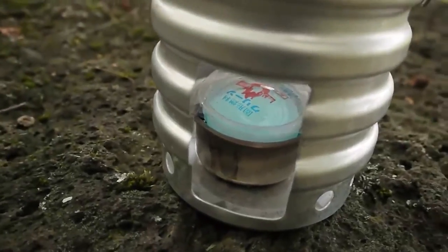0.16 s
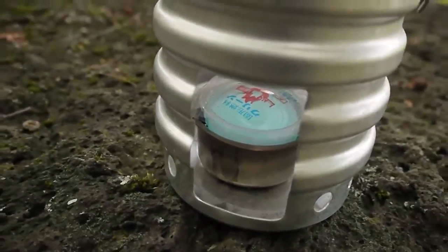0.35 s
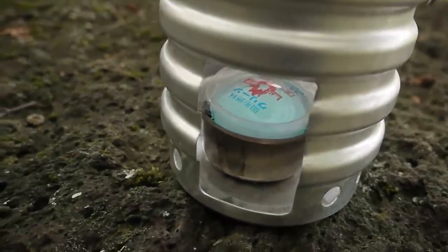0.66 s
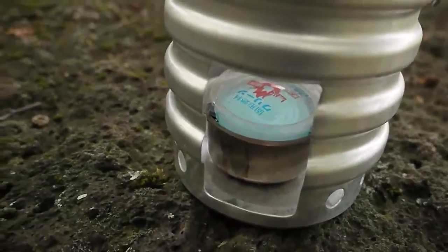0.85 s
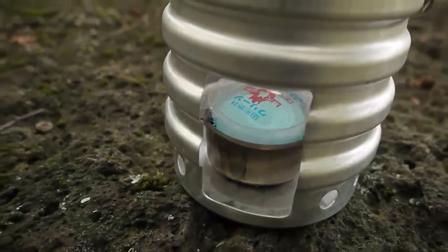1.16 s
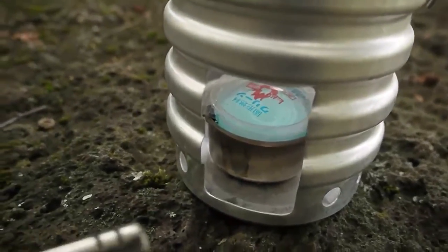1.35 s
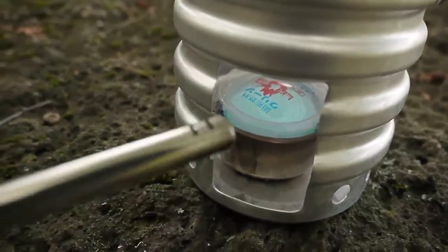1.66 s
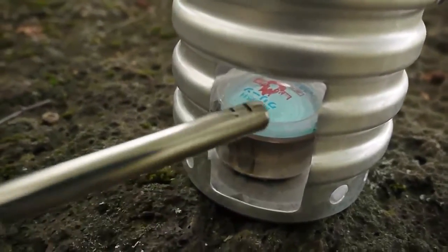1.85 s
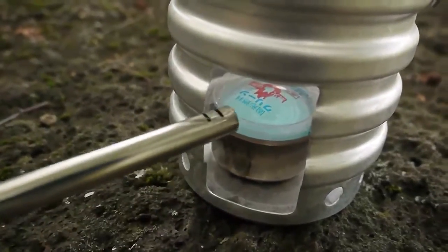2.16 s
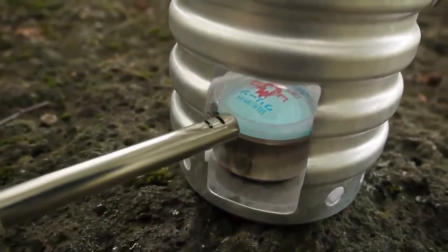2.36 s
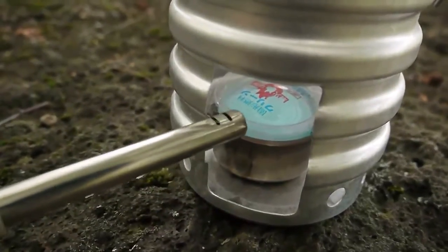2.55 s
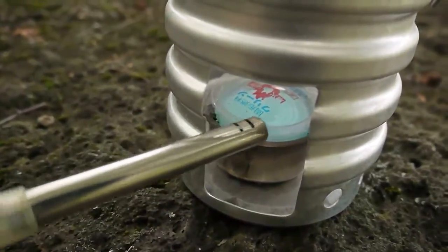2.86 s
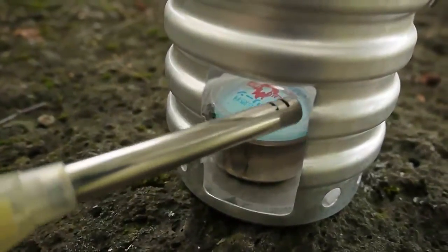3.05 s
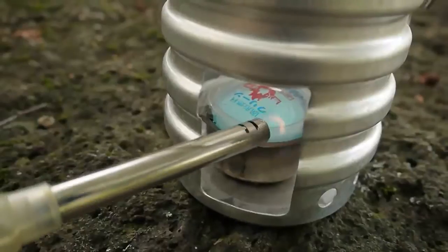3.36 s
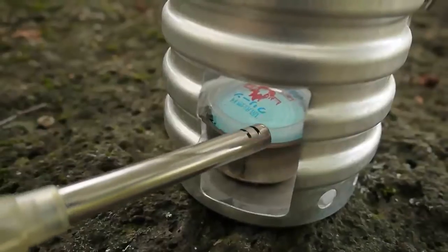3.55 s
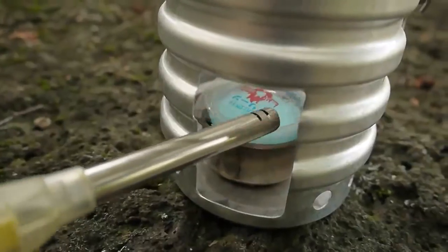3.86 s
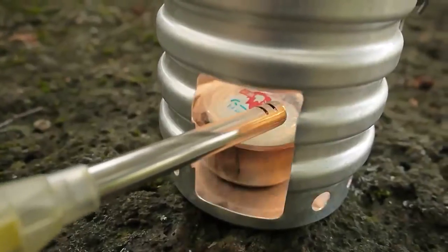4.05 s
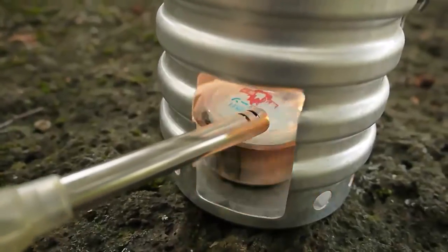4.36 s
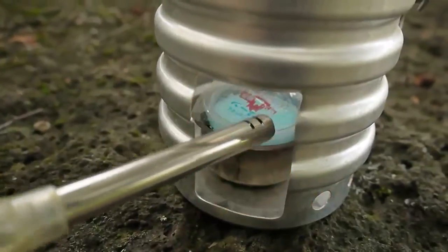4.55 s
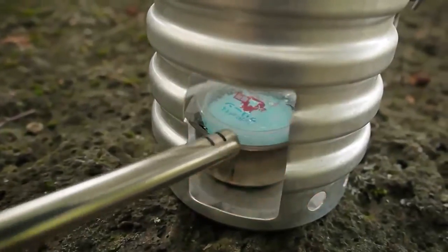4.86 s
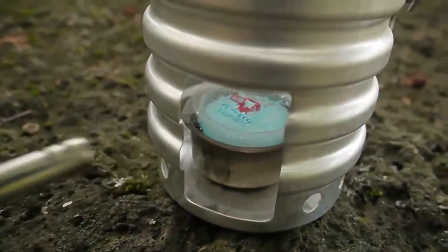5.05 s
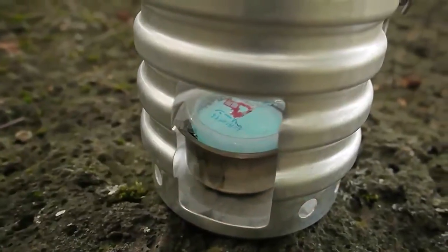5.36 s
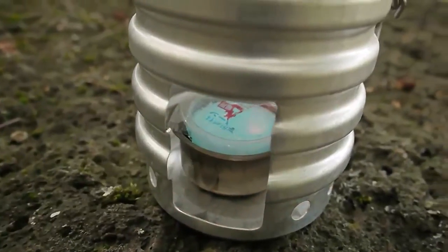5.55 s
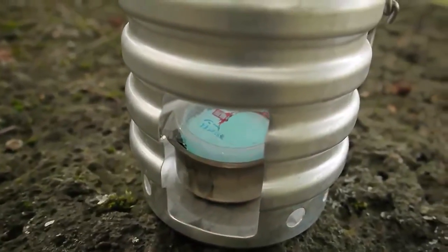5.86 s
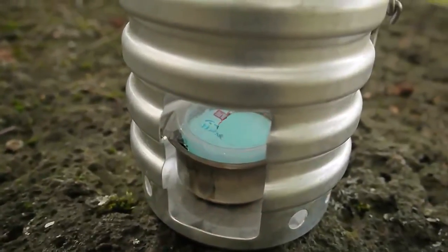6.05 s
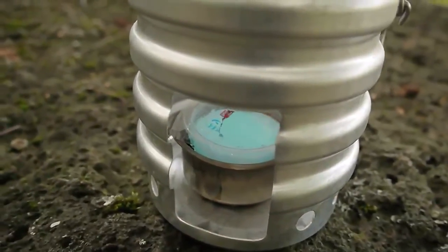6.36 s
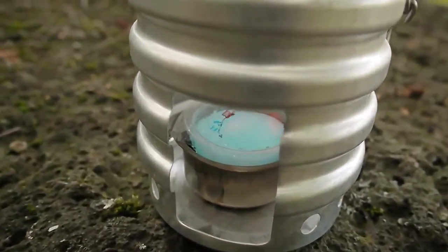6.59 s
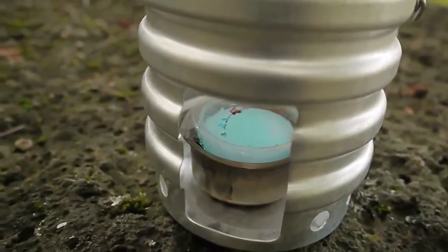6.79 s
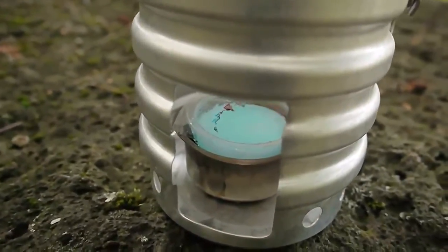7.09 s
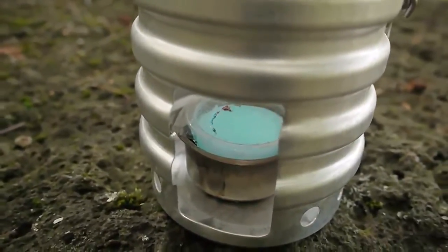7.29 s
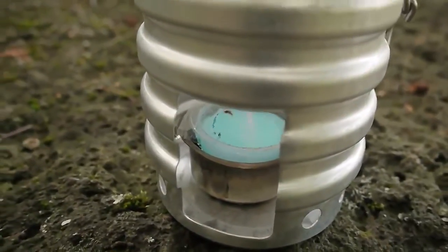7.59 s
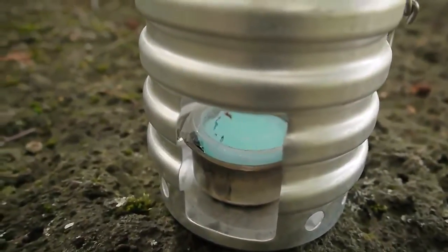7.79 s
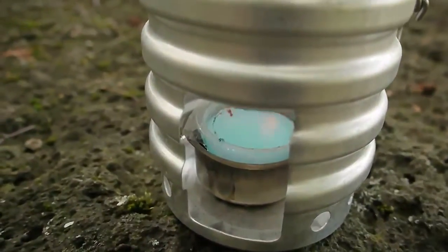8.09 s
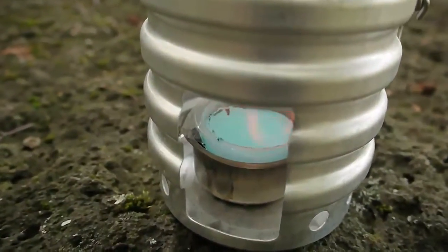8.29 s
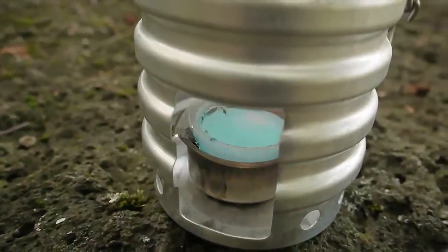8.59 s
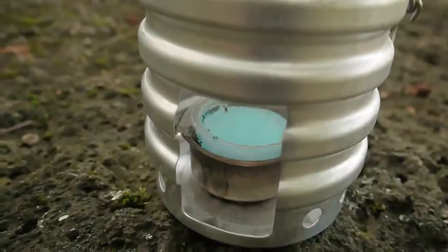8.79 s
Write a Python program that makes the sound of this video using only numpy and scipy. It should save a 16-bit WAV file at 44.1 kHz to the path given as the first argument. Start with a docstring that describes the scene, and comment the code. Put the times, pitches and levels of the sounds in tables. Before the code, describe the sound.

Close up outdoors, lighter handling clicks, two sharp trigger snaps, puffing ignitions, then sparse crackling of melting film amid low fluttering flame and breeze.

```python
"""A wand lighter lights a film-wrapped fuel tablet in a small aluminium camping stove, outdoors and close by.
The lighter is handled (coloured noise bursts, grainy rubbing), knocks the windshield (damped modes) and snaps twice.
The gas catches in two main puffs (damped sines, flaring noise); then the film crackles (random grains) and vents.
Throughout, breeze and flame rumble (gusty low noise, pressure swings) over air and a wavering far hiss (noise)."""
import sys
import numpy as np
from scipy import signal
from scipy.fft import rfft, irfft
from scipy.io import wavfile
from scipy.ndimage import uniform_filter1d

SR = 44100
rng = np.random.default_rng(int(sys.argv[2]) if len(sys.argv) > 2 else 0)


def persist_wave(psi):
    """Save psi, clipped to +-1, as 16-bit WAV."""
    counts = np.round(np.clip(psi, -1, 1) * 32767).astype(np.int16)
    wavfile.write(sys.argv[1], SR, np.atleast_2d(counts).T)


N = 393813
TIME = np.arange(N) / SR
SHORT = TIME[:4096]
BAND_HZ = 7950  # upper edge of the microphone band


def undb(db):
    """Decibels to gain."""
    return 10 ** (np.asarray(db) / 20)


def unit(x):
    """Scale to an rms of one."""
    return x / np.std(x)


def peak(x, db):
    """Scale to a peak level."""
    return x * undb(db) / np.abs(x).max()


def burst(x, db):
    """Scale to an rms level over the first 10 ms."""
    return x * undb(db) / np.std(x[:SR // 100])


def noise():
    """White noise over the whole scene."""
    return rng.standard_normal(N)


def curve(rows):
    """Join (time_s, value) rows by straight lines."""
    return np.interp(TIME, *np.transpose(rows))


def add(track, start_s, sound):
    """Mix a sound into a track from start_s on."""
    start = max(int(start_s * SR), 0)
    track[start:start + len(sound)] += sound[:N - start]


def colour(x, points):
    """Causal minimum-phase filter with the given (freq_hz, gain_db) outline."""
    size = 2048
    hz, db = np.transpose(sorted(map(tuple, points)))
    bins_hz = np.fft.rfftfreq(size, 1 / SR)
    outline_db = np.interp(np.log(bins_hz + 1), np.log(hz), db)
    # folding the cepstrum onto positive times gives minimum phase
    cepstrum = irfft(np.log(undb(outline_db)))
    cepstrum[1:size // 2] *= 2
    cepstrum[size // 2 + 1:] = 0
    response = irfft(np.exp(rfft(cepstrum)))
    return signal.fftconvolve(x, response)[:len(x)]


def fade(t, t60_s):
    """Exponential decay from t = 0, down 60 dB after t60_s."""
    return np.exp(-np.log(1000) * np.maximum(t, 0) / max(t60_s, 1e-4))


def ring(modes):
    """Damped sines of a struck object, from (pitch_hz, gain_db, t60_s) rows."""
    t = TIME[:SR]
    return sum(undb(db) * np.sin(2 * np.pi * hz * t) * fade(t, t60_s) for hz, db, t60_s in modes)


def crack(scatter, rise_s, hold_s, t60_s, tail_db, tail_t60_s):
    """A contact that builds up, rattles briefly and dies away, with a faint tail from the surroundings."""
    rattle = rng.standard_normal(len(SHORT)) * (1 - fade(SHORT, rise_s))
    envelope = fade(SHORT - hold_s, t60_s) + undb(tail_db) * fade(SHORT, tail_t60_s)
    push = scatter * rattle * envelope
    push[int(SR * rise_s / 3)] += 1  # one sharp click
    return push


def walk(rate_hz):
    """Smooth random wander with a spread of one."""
    hold = int(SR / rate_hz)
    steps = np.repeat(rng.standard_normal(N // hold + 1), hold)[:N]
    return unit(uniform_filter1d(uniform_filter1d(steps, hold), hold))


def grains(per_s, spread_db):
    """Random tiny clicks, many small and a few large."""
    sizes = undb(spread_db * np.minimum(rng.exponential(size=N), 4))
    hits = rng.random(N) < per_s / SR
    return unit(hits * sizes * rng.choice([-1, 1], N))


def flicker(x, depth_db, rate_hz):
    """Vary the colour of grains: neighbouring bands swell and sink on their own."""
    out = np.zeros(N)
    for hz in np.geomspace(1100, 7000, num=8):
        band = signal.sosfiltfilt(signal.butter(3, hz, fs=SR, output="sos"), x)
        out += band * undb(depth_db * walk(rate_hz))
        x = x - band
    return out + x


def swells(rows, attack_s, release_s):
    """Gain of overlapping (start_s, length_s, level_db) events that each rise, hold and die away."""
    power = np.zeros(N)
    for start_s, length_s, db in rows:
        t = np.arange(int((length_s + release_s) * SR)) / SR
        gain = undb(db) * (1 - fade(t, attack_s)) * fade(t - length_s, release_s)
        add(power, start_s, gain ** 2)
    return np.sqrt(power)


def rubbing():
    """Hand and wand rub: a run of tiny slips whose force comes and goes."""
    # strokes: start_s, length_s, level_db
    strokes = [(0.1, 0.08, -37), (0.19, 0.075, -32.5), (0.41, 0.16, -45), (0.6, 0.078, -43), (0.8, .1, -44),
               (0.88, .085, -41), (2.23, 0.086, -36.5), (2.345, 0.019, -38.5), (5.97, 0.22, -45.5),
               (6.23, 0.22, -42.5)]
    # spectrum of the rubbing: freq_hz, gain_db
    rub_colour = [(240, -35.5), (400, -18.5), (675, -19.5), (823, -10.5), (1530, -9), (1870, -8.5),
                  (2290, -9), (2760, -11.5), (5670, -19), (7840, -28), (10200, -64.5), (17200, -120)]
    slips = grains(per_s=1700, spread_db=4.6) * undb(2.2 * walk(rate_hz=110))
    slips = flicker(slips, depth_db=3.5, rate_hz=140)
    return unit(colour(slips, rub_colour)) * swells(strokes, attack_s=0.061, release_s=0.15)


def contact(pitch_hz, tilt_db, t60_s):
    """One tick of plastic or metal: a short rattle with a broad resonance at its own pitch."""
    # colour that all contacts share: freq_hz, gain_db
    tick_colour = [(150, -22.5), (500, -19.5), (1000, 0.5), (1400, -1), (2100, 0.5), (3000, -2),
                   (4300, -3.5), (5300, -9), (8000, -21)]
    hump_db, width_oct = 6.5, 0.46
    push = crack(scatter=0.39, rise_s=0.0015, hold_s=0.002, t60_s=t60_s, tail_db=-24, tail_t60_s=0.073)
    bands_hz = np.geomspace(150, 8000, num=32)
    hump = hump_db * np.exp(-.5 * (np.log2(bands_hz / pitch_hz) / width_oct) ** 2)
    tick = colour(colour(push, tick_colour), zip(bands_hz, hump))
    return colour(tick, [(1800, 0.0071), (6000, tilt_db)])


def disperse(x, spread_s):
    """Bending waves along the wand: the treble arrives first, lower tones up to spread_s later."""
    hz = np.fft.rfftfreq(len(x), 1 / SR)
    delay_s = spread_s * (np.sqrt(BAND_HZ / np.clip(hz, BAND_HZ / 4, BAND_HZ)) - 1)
    # phase is the running sum of delay over frequency
    return irfft(rfft(x) * np.exp(-2j * np.pi * np.cumsum(delay_s) * hz[1]))


def snap(peak_db, rattle_s):
    """The piezo hammer strikes in its plastic grip; the blow disperses along the wand."""
    # hammer in its grip: freq_hz, gain_db
    grip = [(200, -23), (800, -12), (1400, -5.5), (1800, -9), (2150, 2.5), (2600, -9), (3100, 3),
            (3600, -8.5), (4300, 0.5), (5200, -8.5), (7000, -6.5), (8000, -14.5)]
    blow = crack(scatter=0.13, rise_s=0.00071, hold_s=rattle_s, t60_s=0.0076, tail_db=-32.5, tail_t60_s=0.26)
    return peak(disperse(colour(blow, grip), spread_s=0.0013), peak_db)


def lighter():
    """Rubbing, plastic and metal contacts, the ringing windshield and the two piezo snaps."""
    # lighter handled, trigger pressed, wand touching the stove:
    # start_s, level_db (rms over 10 ms), pitch_hz, tilt_db (treble), t60_s
    ticks = [(0.015, -27.5, 2060, 3, 0.003), (0.11, -17.0, 2020, -2, 0.01), (0.116, -23, 2530, -5, 0.013),
             (0.143, -23.5, 1310, -0.5, 0.045), (0.269, -24.5, 1640, 0, 0.09),
             (0.331, -12.5, 2500, 3, 0.01), (0.356, -35, 1760, 8, 0.024), (0.397, -20.5, 1950, -2, 0.018),
             (0.413, -33, 1290, -10, 0.025), (0.42, -26.0, 1230, -10, 0.028),
             (0.455, -27.0, 1610, 4, 0.068), (0.47, -29.5, 1760, -24, 0.022), (0.506, -25, 1530, -2, 0.016),
             (0.625, -32, 1500, 7, 0.056), (0.697, -38, 5030, 21, 0.0091), (0.844, -24.5, 1930, -1, 0.024),
             (0.944, -20.0, 3170, 3.5, 0.009), (1.351, -25.5, 2530, 1, 0.01), (1.496, -27, 2740, -5, 0.013),
             (1.993, -37.5, 850, 2, 0.012), (2.089, -26, 4800, 21, 0.0058), (2.12, -16, 845, 16, 0.008),
             (2.23, -18, 1920, 3, 0.035), (2.29, -17, 5040, -0.5, 0.02), (2.587, -22.5, 3630, -3, 0.017),
             (2.63, -25.5, 3740, -3, 0.0036), (2.716, -19, 2900, 7, 0.012), (3.012, -34.5, 4170, 8, 0.0076),
             (3.08, -33, 5030, 3, 0.016), (3.089, -23, 5200, 0, 0.015), (3.103, -35, 1170, -1, 0.013),
             (3.257, -26.5, 910, 10, 0.0074), (3.567, -36, 1380, 9, 0.008), (4.817, -32.5, 5000, 17, 0.008),
             (4.87, -23.5, 850, 5, 0.011), (4.907, -29, 5050, -8, 0.0036), (4.915, -33, 5000, -3, 0.012),
             (6.241, -27.5, 2420, 2, 0.02), (6.268, -32, 4360, -1, 0.0088), (6.413, -33, 2210, -13, 0.019),
             (6.427, -24.5, 2530, 11, 0.008), (6.447, -29.5, 2530, -1, 0.023),
             (6.458, -30.0, 2210, 1, 0.031)]
    # wand knocks the windshield: start_s, ring_gain_db
    knocks = [(2.23, -30), (2.2900, -28.5)]
    # windshield modes: pitch_hz, gain_db, t60_s
    shield = [(786, -9, .65), (894, -1, .45), (991, 1, .24), (1583, -8, .25), (1884, -7, .2),
              (2116, -6, .15), (3284, -16, .25), (3951, -6, .08), (4560, -16, .2), (5023, -13, .15)]
    # piezo hammer strikes: start_s, peak_db, rattle_s, ring_gain_db
    snaps = [(2.733, 7.008, 0.0023, -28.5), (3.4207, 6, 0.0024, -34)]
    # lighter body and hammer spring modes: pitch_hz, gain_db, t60_s
    spring = [(2150, 20, .02), (3650, 0, .18), (3900, -11, .1)]
    out = rubbing()
    for start_s, db, pitch_hz, tilt_db, t60_s in ticks:
        add(out, start_s, burst(contact(pitch_hz, tilt_db, t60_s), db))
    for start_s, ring_db in knocks:
        add(out, start_s, undb(ring_db) * ring(shield))
    for start_s, peak_db, rattle_s, ring_db in snaps:
        add(out, start_s, snap(peak_db, rattle_s))
        add(out, start_s + rattle_s / 2, undb(ring_db) * ring(spring))
    return out


def flare(length_s, roar_db, t60_s):
    """A tongue of burning gas: roaring and hissing noise; stronger flares hiss relatively more."""
    # low part of the flame: freq_hz, gain_db
    roar_colour = [(100, -47), (400, 0), (650, -2), (900, 4.5), (1150, -4), (1370, -13), (1720, -0.5),
                   (2100, -38.5), (3000, -39), (4000, -56)]
    # high part of the flame: freq_hz, gain_db
    hiss_colour = [(1200, -24), (2000, -7.5), (2830, -4), (3210, -10.5), (3650, 0.5), (4500, -9.5),
                   (5000, -3.5), (7840, -11.5)]
    even_db, growth = -8, 0.74  # roar level with equal hiss; dB of hiss share per dB of roar
    t = TIME[:SR // 4]
    roar, hiss = rng.standard_normal((2, len(t)))
    hiss_gain = undb(growth * (roar_db - even_db))
    flame = unit(colour(roar, roar_colour)) + hiss_gain * unit(colour(hiss, hiss_colour))
    return undb(roar_db) * flame * (1 - fade(t, 0.006)) * fade(t - length_s, t60_s)


def gas():
    """The gas pops in the hollow of the stove as damped sines and burns off in short flares."""
    # gas catches with a pop: start_s, peak_db, pitch_hz, t60_s
    ignitions = [(3.8630, -4, 904, 0.012), (3.8675, -7, 787, 0.025), (3.9606, -16, 835, 0.0067),
                 (4.431, 0, 660, 0.0055), (4.4950, -13, 770, 0.0062), (4.7690, -22, 533, 0.0077)]
    # tongues of burning gas: start_s, length_s, roar_db, t60_s
    flares = [(3.583, 0.011, -36, 0.081), (3.699, 0.012, -42, 0.05), (3.862, 0.0071, -14.5, 0.057),
              (3.91, 0.028, -32.5, 0.11), (3.996, 0.052, -45.5, 0.14), (4.429, 0.02, -10.5, 0.037),
              (4.449, 0.02, -13.5, 0.029), (4.478, 0.032, -32.5, 0.14), (4.615, 0.011, -33.5, 0.23)]
    out = np.zeros(N)
    for start_s, peak_db, pitch_hz, t60_s in ignitions:
        add(out, start_s, peak(-ring([(pitch_hz, 0, t60_s)]), peak_db))
    for start_s, length_s, roar_db, t60_s in flares:
        add(out, start_s, flare(length_s, roar_db, t60_s))
    return out


def blister():
    """One blister bursts and sounds the hollow of the stove."""
    # colour of the hollow: freq_hz, gain_db
    hollow = [(150, -13), (500, -4.5), (880, 4), (1250, -7), (1650, -0.5), (2100, -16.5), (2600, -9),
              (3000, -17), (3700, -13), (4400, -16.5), (5100, -10.5), (6100, -17.5), (7400, -16.5),
              (8200, -29)]
    pop = crack(scatter=0.17, rise_s=.003, hold_s=0.00033, t60_s=0.012, tail_db=-21.5, tail_t60_s=.09)
    return colour(pop, hollow)


def sizzle():
    """Gas and melting film sizzle in spells: tiny bursts ring between metal walls, small blisters join in."""
    # spells of fine sizzle: start_s, length_s, level_db
    sizzles = [(2.93, 0.066, -46), (3.33, 0.064, -47.5), (3.71, .11, -50.5), (4.64, 0.27, -52.5),
               (5.2, 0.69, -59.5), (5.64, 0.4, -49.5), (6.15, 0.59, -54.5), (6.9, 0.15, -46.5),
               (7.5, .2, -54.5), (7.9, 0.61, -54.5), (8.3, 0.2, -47.5), (8.5, 0.46, -56.5)]
    # spectrum of the sizzle: freq_hz, gain_db
    sizzle_colour = [(400, -19), (880, 13), (1300, -1.5), (1700, -4.5), (2600, -15.5), (3600, 1),
                     (4400, -4.5), (5200, -2.5), (6200, -1), (7500, -4.5), (8200, -19)]
    blisters_per_s, blister_db = 20, -1  # blister level relative to the crackle
    crackle = grains(per_s=230, spread_db=5.2)
    walls = crack(scatter=0.024, rise_s=0.0011, hold_s=0.0011, t60_s=0.02, tail_db=-20, tail_t60_s=.08)
    crackle = signal.fftconvolve(crackle, walls)[:N]
    crackle = flicker(crackle, depth_db=4.5, rate_hz=90)
    small = signal.fftconvolve(grains(blisters_per_s, spread_db=6.5), blister())[:N]
    out = unit(colour(crackle, sizzle_colour)) + undb(blister_db) * unit(small)
    return out * swells(sizzles, attack_s=0.06, release_s=0.46)


def vapour():
    """Jets of vapour whistle softly out of the film: narrow-band noise of wavering strength."""
    # jets: start_s, length_s, level_db, pitch_hz
    jets = [(4.44, 1.1, -65.5, 4850), (6.606, 1.2, -64.5, 5000), (8.095, 0.21, -58.5, 5130),
            (8.277, 0.52, -56.5, 5270)]
    # whistle spectrum, moved to each jet's pitch: freq_hz, gain_db
    vapour_colour = [(4000, -33), (4700, -10), (5000, 10.5), (5250, 1), (5480, -1), (5900, -18),
                     (6600, -34)]
    colour_pitch_hz = 5000
    out = np.zeros(N)
    for start_s, length_s, db, pitch_hz in jets:
        whistle = colour(noise(), np.array(vapour_colour) * [pitch_hz / colour_pitch_hz, 1])
        gain = swells([(start_s, length_s, db)], attack_s=0.29, release_s=.5)
        out += unit(whistle) * undb(2 * walk(rate_hz=25)) * gain
    return out


def film():
    """The wrapper sizzles and vents vapour as it melts; large blisters burst in it."""
    # large blisters: start_s, level_db (rms over 10 ms), tilt_db (treble)
    pops = [(5.269, -37, -8), (5.581, -30, 0), (5.696, -33.5, -5.5), (5.707, -33.5, -4.5),
            (5.768, -38.0, 4), (5.891, -42, 0), (5.935, -40.5, -4), (5.972, -32.5, -7), (6.013, -40, 11),
            (6.066, -35.5, 1), (6.156, -39, 7), (6.333, -19.5, 5), (6.554, -34, -4), (6.567, -19.5, -3),
            (6.635, -33, -10), (6.659, -33, 0.5), (6.743, -29.5, -7.5), (6.833, -36, 7),
            (6.942, -16.5, 3.5), (7.035, -34.0, -6), (7.166, -37.5, 3.5), (7.525, -32.5, 4),
            (7.53, -25.5, 1.5), (7.578, -26, 5.5), (7.597, -36.5, 8), (7.697, -37, 6.5), (7.932, -26.5, -4),
            (7.998, -30, 5), (8.02, -29.5, 6.5), (8.112, -20, 3.5), (8.331, -36, 5.5), (8.381, -39, 17),
            (8.416, -38, 9), (8.635, -35.5, 20), (8.777, -37.5, 3)]
    out = sizzle() + vapour()
    for start_s, db, tilt_db in pops:
        add(out, start_s, burst(colour(blister(), [(1800, 0), (4500, tilt_db)]), db))
    return out


def buffet(pitch_hz, peak_db):
    """One swing of pressure, centred in a short stretch of time."""
    swing = 2 * np.pi * pitch_hz * (SHORT - SHORT.mean())
    return peak(swing * np.exp(-swing ** 2 / 2), peak_db)


def rumble():
    """Eddies of breeze and flame come in gusts, with single swings of pressure standing out."""
    # rumble spectrum: freq_hz, gain_db
    rumble_colour = [(15, -13), (28, 10.5), (65, 7.5), (105, 3.5), (160, -4), (260, -15), (420, -33),
                     (800, -41), (1400, -78.5)]
    # gusts of breeze and surges of flame: start_s, length_s, level_db
    gusts = [(0.16, 0.062, -43), (0.48, 0.04, -37.5), (0.75, 0.028, -36.5), (1.06, 0.12, -32),
             (1.24, 0.15, -43), (2.12, 0.057, -36), (2.41, .055, -32), (2.5, 0.053, -30.5),
             (2.6, 0.1, -33.5), (2.71, 0.2, -28.5), (3.03, 0.15, -29.5), (3.22, 0.33, -30.5),
             (3.58, 0.12, -27.5), (3.82, .27, -29), (4.12, 0.17, -25.5), (4.24, 0.15, -22.5),
             (4.6, .08, -30.5), (4.72, 0.15, -24), (4.94, 0.19, -25), (5.12, 0.14, -25), (5.37, .11, -27),
             (5.5, 0.075, -28.5), (5.74, 0.21, -28), (6.52, 0.16, -36.5), (6.72, 0.022, -29),
             (7.0, 0.17, -36.5), (7.16, 0.062, -30), (7.5, .09, -29), (7.73, 0.13, -33),
             (7.63, 0.082, -24.5), (8.0, 0.29, -27.5), (8.32, 0.29, -31.5), (8.64, 0.14, -25.5),
             (8.87, 0.075, -24.5)]
    # strongest buffets of air: centre_s, peak_db, pitch_hz
    buffets = [(1.074, -24, 116), (2.782, -16, 121), (2.802, -21, 173), (3.382, -15.5, 178),
               (3.449, -19.5, 480), (3.454, -17, 330), (4.151, -17.5, 153), (4.289, -15.5, 123),
               (4.712, -11, 140), (4.994, -12, 114), (5.042, -15.5, 176), (5.421, -17.5, 163),
               (5.942, -16.5, 86), (7.661, -15.5, 139), (8.772, -15.5, 82)]
    calm_db = -51.5  # gain between gusts
    eddies_per_s, eddy_hz, eddy_db = 5, 158, 4.5  # lesser buffets: middle pitch, highest peak re gust gain
    eddies = colour(noise(), rumble_colour)
    large = signal.sosfiltfilt(signal.butter(2, 120, fs=SR, output="sos"), eddies)
    # small eddies arrive in flurries, large ones roll on more evenly
    flurry = np.tanh(walk(rate_hz=36))
    small = (eddies - large) * undb(7 * flurry)
    large = large * undb(5 * flurry)
    out = unit(large + undb(-1.5) * small)
    for when, octaves, size in rng.random(size=(int(eddies_per_s * N / SR), 3)):
        add(out, when * TIME[-1], size * buffet(eddy_hz * 2 ** (octaves - .5), eddy_db))
    out *= np.hypot(swells(gusts, attack_s=0.024, release_s=0.39), undb(calm_db))
    for centre_s, peak_db, pitch_hz in buffets:
        add(out, centre_s - SHORT.mean(), buffet(pitch_hz, peak_db))
    return out


def outdoors():
    """The broad hush of the air and a far, wavering hiss in narrow bands, both coloured noise."""
    # spectrum of the hush: freq_hz, gain_db
    air_colour = [(20, 3.5), (32, 1.5), (60, 0), (160, -11), (370, -11), (730, -14.5), (1400, -16),
                  (2500, -16), (2900, -23), (4400, -23.5), (4950, -24.5), (5600, -29), (7000, -30.5),
                  (7840, -40)]
    # level of the hush: time_s, level_db
    air_level = [(0, -45), (2.3, -44.5), (2.9, -45.5), (4.3, -46), (4.95, -47), (5.3, -45.5), (8.9, -44)]
    # spectrum of the far hiss: freq_hz, gain_db
    far_colour = [(1450, -35.5), (1780, -7.5), (2030, -19.5), (2330, -5.5), (2420, -8), (2530, 0.5),
                  (2680, -8.5), (2830, -27), (3200, -46)]
    # level of the far hiss: time_s, level_db
    far_level = [(0, -42), (.95, -50.5), (1.15, -42.5), (2.1, -43.5), (3.0, -44.5), (4.4, -46),
                 (5.4, -44.5), (7.0, -44.5), (8.9, -44)]
    air = unit(colour(noise(), air_colour)) * undb(curve(air_level) + 0.6 * walk(rate_hz=3.5))
    far_db = curve(far_level) + 3.0 * np.tanh(walk(rate_hz=19))
    far = unit(colour(noise(), far_colour)) * undb(far_db)
    return air + far


def scene():
    """Everything sits straight ahead, alike in both channels."""
    sound = lighter() + gas() + film() + rumble() + outdoors()
    return np.array([sound, sound])


def record(dry):
    """Narrow-band microphones, the left one thinner in the bass; loud bursts duck the gain and overload."""
    top_hz, duck_s, duck_db = 15500, 0.065, -13.5
    left = signal.sosfilt(signal.butter(1, 105, "high", fs=SR, output="sos"), dry[0])
    sound = signal.sosfilt(signal.ellip(8, .3, 70, BAND_HZ, fs=SR, output="sos"), [left, dry[1]])
    # the right channel's smoothed power ducks both
    keep = np.exp(-1 / (duck_s * SR))
    power = signal.lfilter([1 - keep], [1, -keep], sound[1] ** 2)
    ducked = sound / np.sqrt(1 + power / undb(duck_db) ** 2)
    clipped = np.clip(ducked, -1, 1)
    return signal.sosfilt(signal.ellip(8, .2, 70, top_hz, fs=SR, output="sos"), clipped)


dry = scene()
out = record(dry)
persist_wave(out)
```